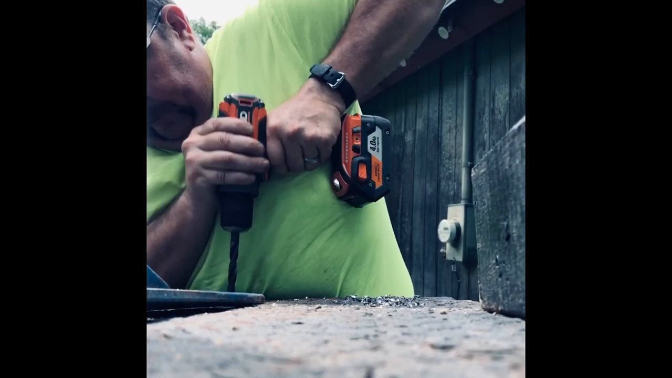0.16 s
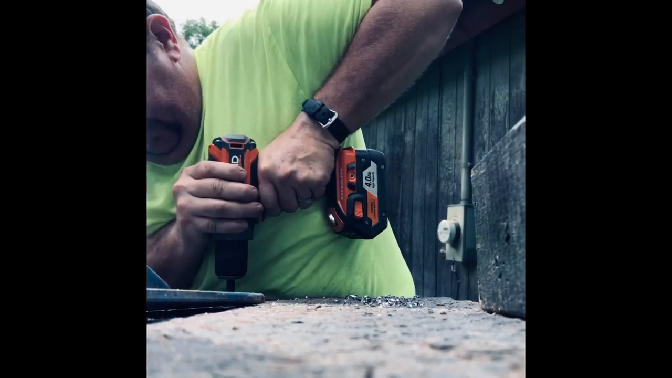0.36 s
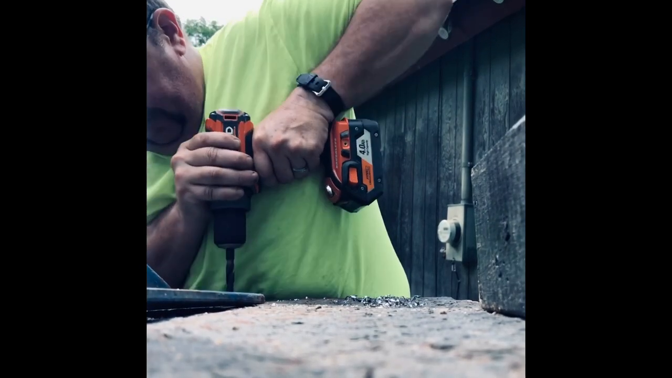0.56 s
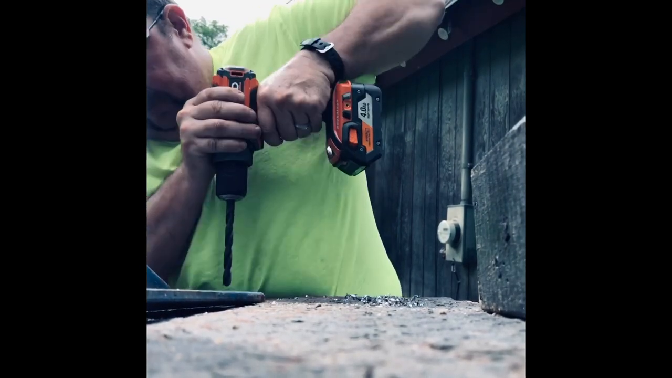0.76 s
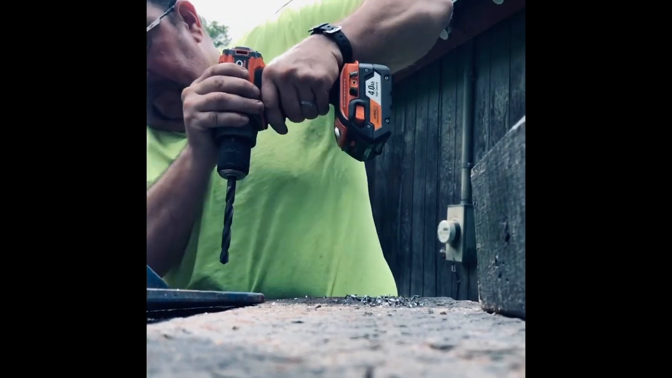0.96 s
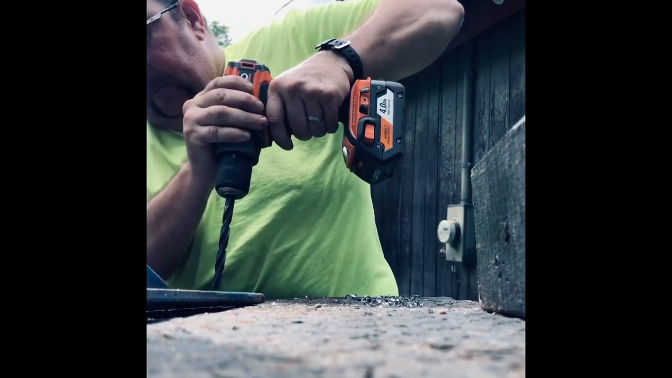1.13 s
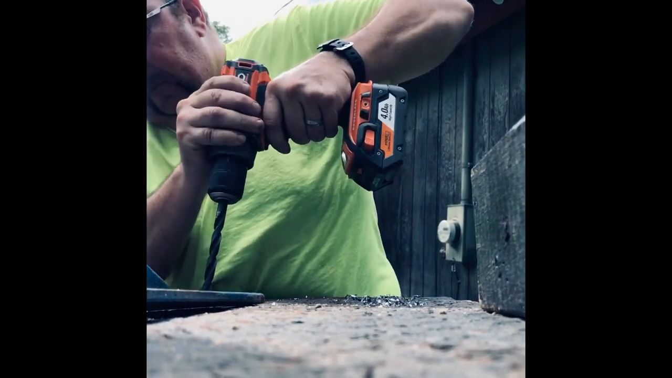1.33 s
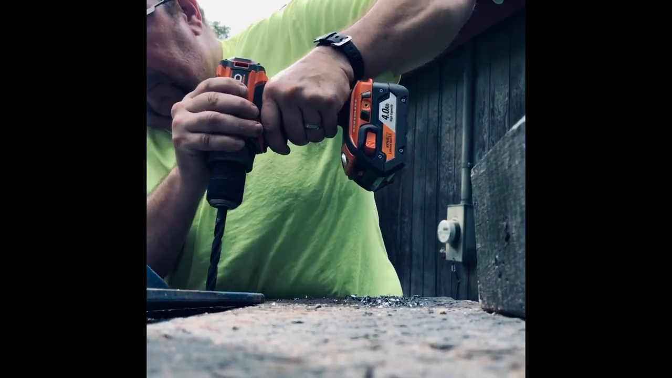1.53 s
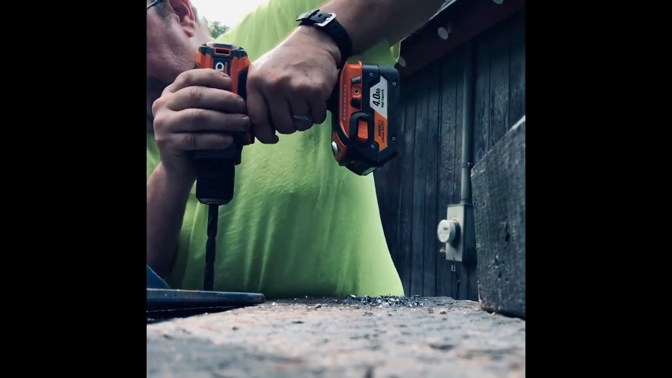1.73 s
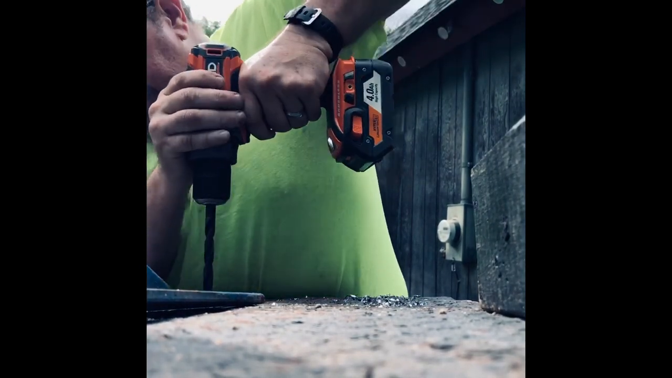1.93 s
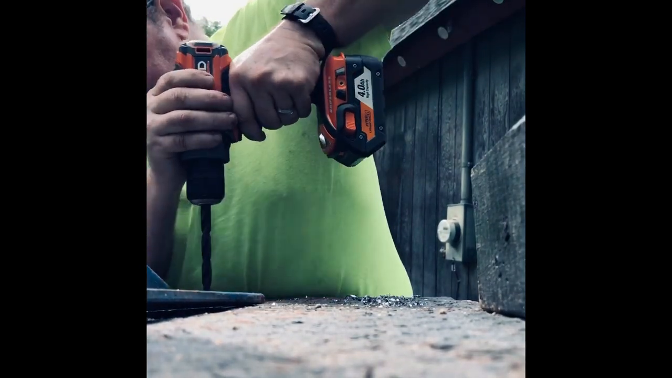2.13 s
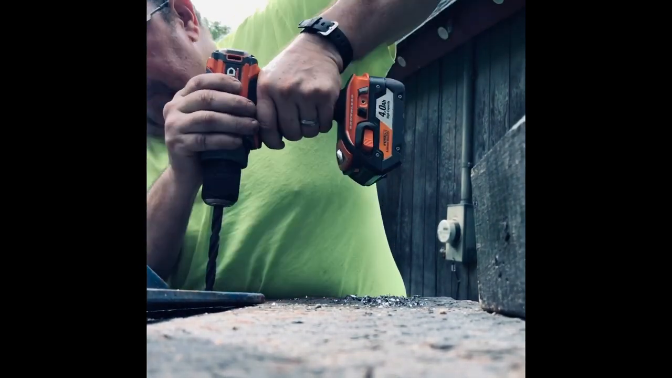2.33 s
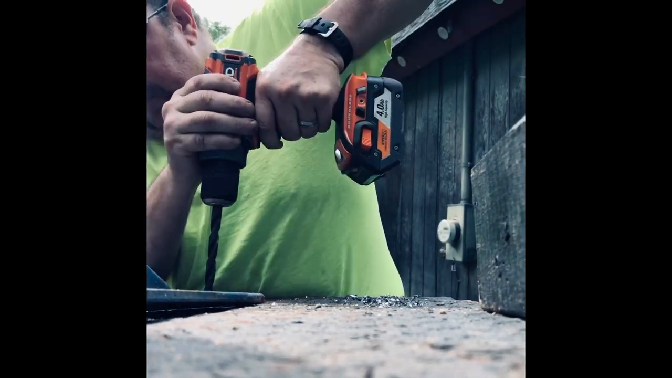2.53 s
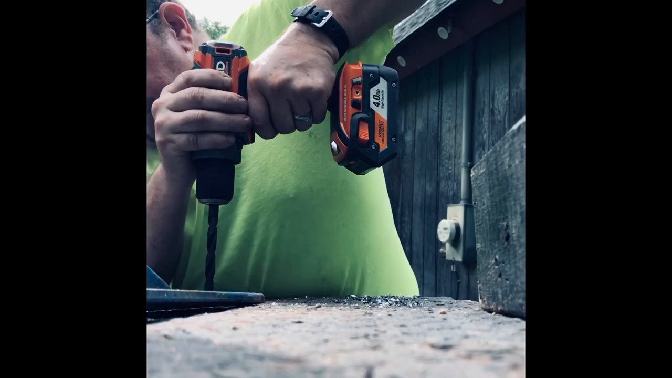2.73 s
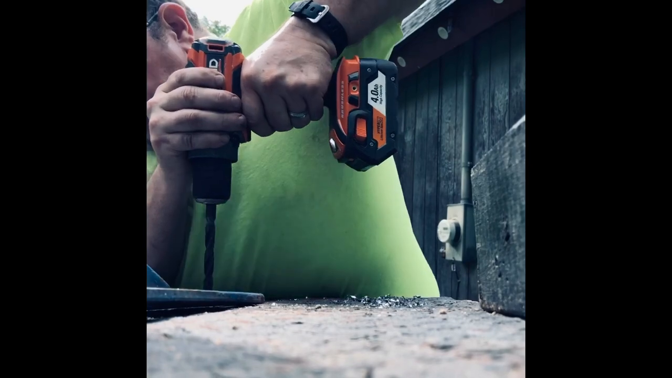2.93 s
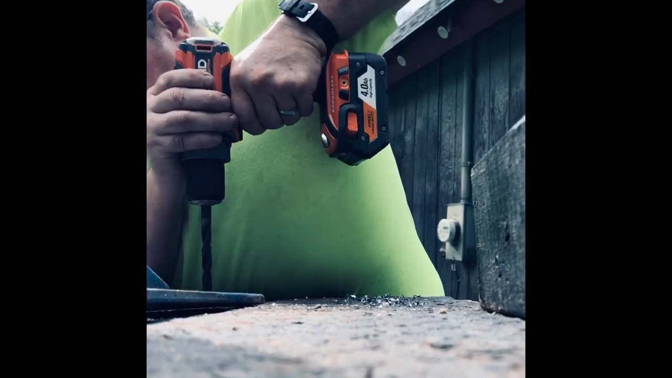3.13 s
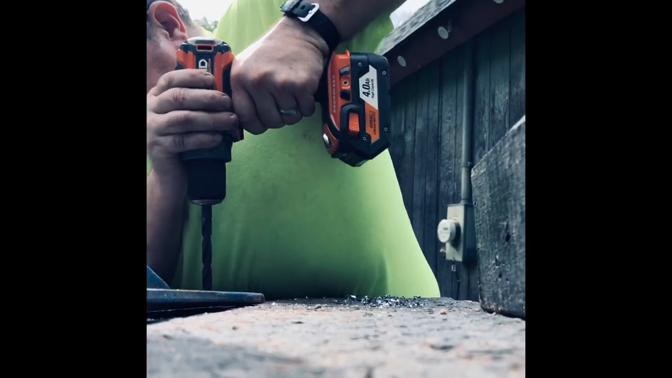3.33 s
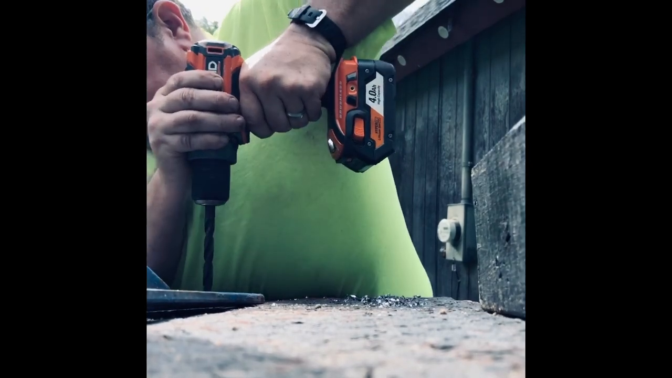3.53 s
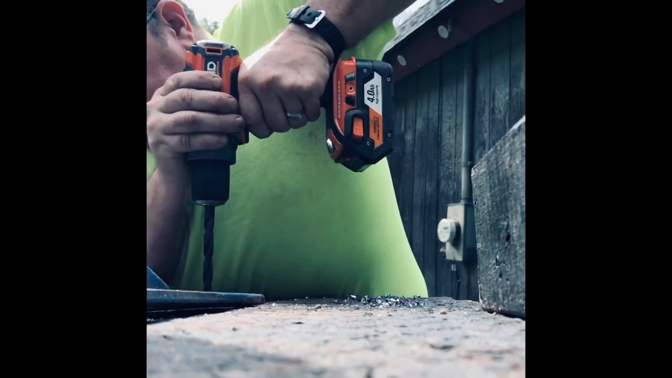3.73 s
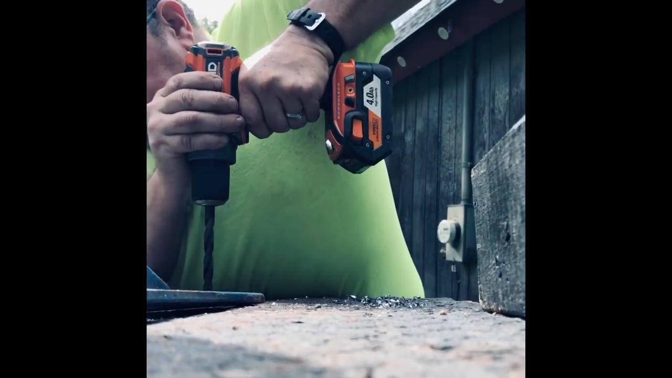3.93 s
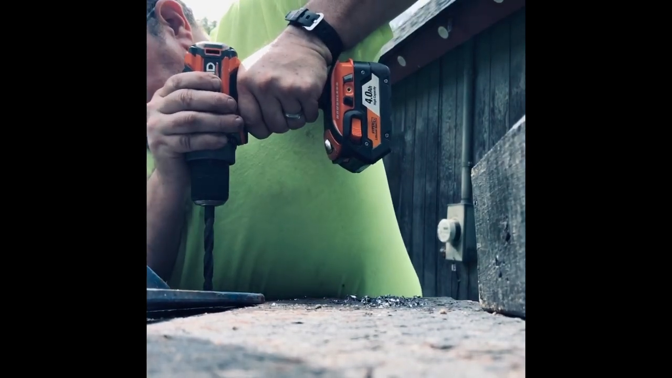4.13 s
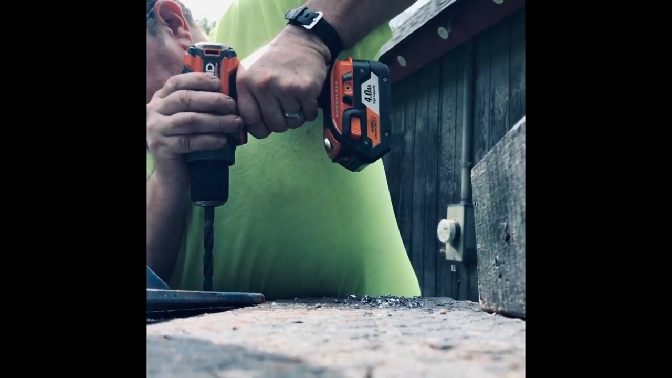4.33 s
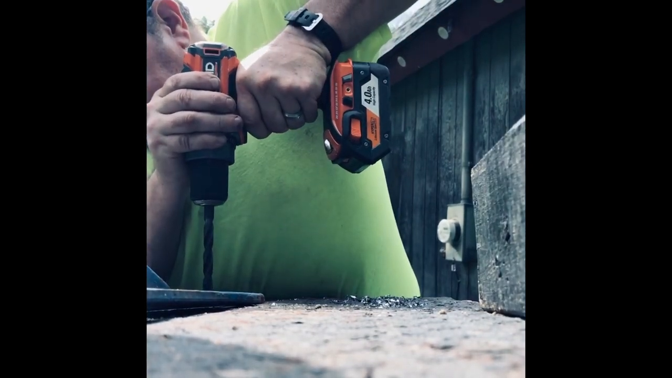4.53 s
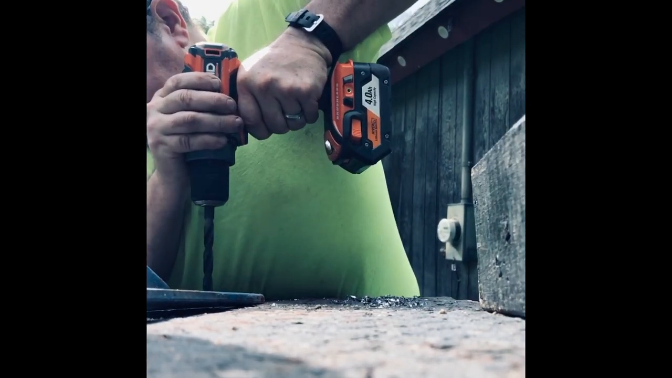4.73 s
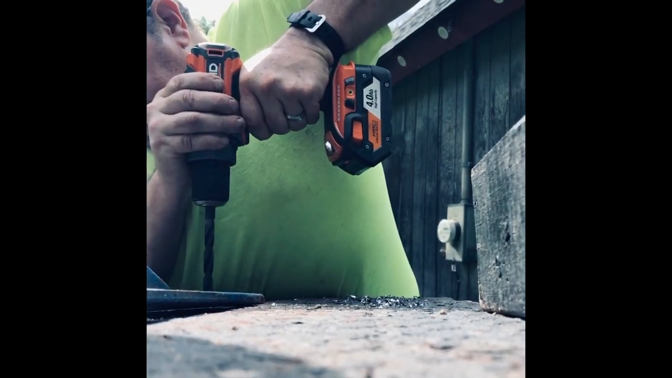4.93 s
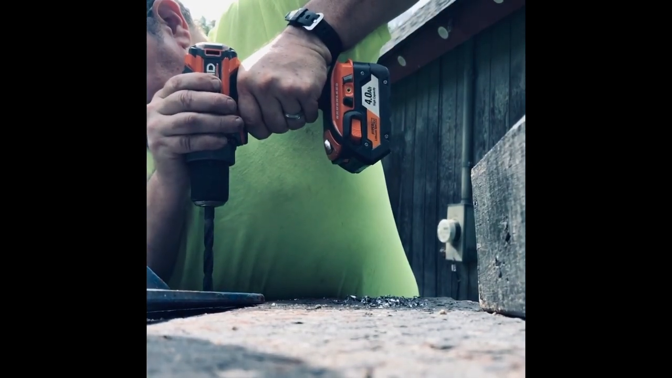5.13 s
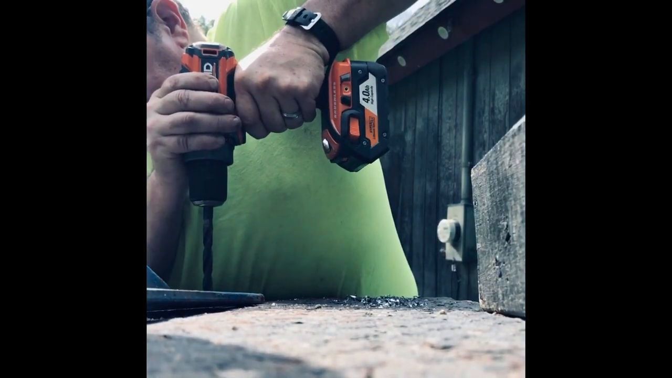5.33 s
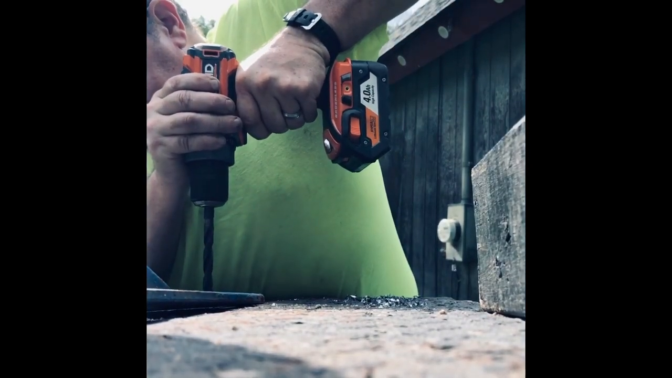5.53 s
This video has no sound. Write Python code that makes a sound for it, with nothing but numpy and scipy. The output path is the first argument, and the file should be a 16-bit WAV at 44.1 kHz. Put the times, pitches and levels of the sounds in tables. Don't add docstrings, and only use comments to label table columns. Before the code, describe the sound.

Outdoors and close up, a cordless drill bores ringing sheet metal in two bursts, with hard knocks and a quiet pause between them.

```python
import sys
import numpy as np
from scipy import signal
from scipy.fft import rfft, irfft, next_fast_len
from scipy.io import wavfile
from scipy.ndimage import map_coordinates

SR = 44100
rng = np.random.default_rng(int(sys.argv[2]) if len(sys.argv) > 2 else 0)


def field_ratio(decibels):
    return 10 ** (np.asarray(decibels, dtype=float) / 20)


def transcribe(signal):
    frames = np.atleast_2d(signal).T
    limited = np.clip(frames, -1, 1)
    pcm = np.round(limited * 32767).astype(np.int16)
    wavfile.write(sys.argv[1], SR, pcm)


N = 245195
TIME = np.arange(N) / SR

RELEASE_S, BRAKE_S, STOP_S = .735, .826, 0.911
START_S, BITE_IN_S, DEEP_S = 2.72, 2.75, 3.055
COAST_HZ, COAST_DB, SPIN_UP_S, SPIN_GAP_HZ, SPIN_LOSS_DB = 310, 7, .043, 1250, 30
STOP_DB_PER_S, RISE_DB_PER_S = 902, 415
WHINE_ORDER, TEETH_PER_TURN, SNAG_AT_S = 2.37, 198, 4.508

# frequency in Hz, level in dB per Hz.
YARD_AIR = [(15, -60), (35, -34), (60, -19.5), (150, -14.5), (317, -15), (450, -18.5), (1190, -23.5),
            (1500, -30.5), (3500, -32), (6000, -38.5), (10000, -49.5), (16000, -74)]
# centre in seconds, level in dB, width in seconds.
RUMBLES = [(.1, -34.5, 0.32), (.75, -34, 0.18), (1.15, -57, 0.12), (1.5, -42.5, 0.16), (3.2, -29.5, 0.34),
           (3.7, -38, 0.33)]

# start in seconds, length in seconds, last switching tone in Hz,
# last buzz in dB, last grind in dB.
FEATHER = [
    (1.905, 0.1405, 9880, -41, -31),
    (2.667, 0.057, 9540, -17.5, -22),
]
# centre in seconds, level in dB, width in seconds.
BRAKE_BUZZ = [
    (.912, -28, 0.0086),
]
# frequency in Hz, level in dB per Hz.
GRIND = [(88, -26.5), (150, -3), (297, -1.5), (448, -2.5), (905, -4.5), (2980, -2), (6020, -14.5),
         (10200, -17), (16000, -44.5)]

# start in seconds, level in dB, 60 dB decay in seconds.
THUDS = [(.285, -18.5, 0.18), (.468, -19, 0.076), (1.429, -29, 0.33), (1.48, -27.5, 0.22),
         (1.52, -35, 0.33), (1.605, -27, 0.085), (1.97, -46, 0.088)]
# start in seconds, peak in dB, pitch in Hz, 60 dB decay in seconds.
CLANKS = [(.012, -7.5, 3610, 0.072), (.022, -3.5, 4270, 0.052), (0.063, -12, 1494, .09),
          (.497, -5.5, 4110, 0.05), (.827, -14, 2840, .034), (2.809, -4, 4504, 0.025),
          (2.808, -9, 2280, 0.057)]
BONKS = [(.466, -12, 406, 0.099), (.509, -9, 520, 0.15), (0.529, -11, 516, 0.16), (.552, -2.5, 980, 0.015),
         (0.694, -12.5, 367, 0.087), (1.432, -19.5, 480, 0.2), (1.484, -25, 529, 0.19),
         (1.982, -28, 230, 0.13)]
SNAPS = [
    (.605, -11.5, 3950, .04),
    (0.638, -8, 3630, 0.055),
    (0.674, -13, 3330, 0.044),
]
TICKS = [(1.425, -38, 2490, .1), (1.485, -45, 2500, .1), (1.908, -38, 6000, .03), (2.424, -29, 3740, 0.058),
         (2.489, -28.5, 4880, 0.041), (2.497, -38, 7500, .034), (2.668, -31, 7000, 0.032)]
AFTER_RING = [
    (0.93, -40, 320, 1.7),
]
FLICK = [
    (2.728, 0.77, 2830, 0.041),
]
STREAK = [
    (.058, -21, 3770, .15),
]
# smear as a share of pitch, crack from 0 to 1, glide in Hz per second.
KNOCK_KINDS = [
    (0.043, 0.48, 0),
    (.06, 0.06, 0),
    (0.052, 1, 0),
    (.25, .2, 0),
    (.02, 0, -2),
    (.02, 0.1, 50000),
    (.01, .05, -24000),
]

# frequency in Hz, width in Hz, level in dB.
PANEL = [(100, 26, -16.5), (144, 28, -10), (231.3, 44.5, -2.5), (289.5, 45.4, -3), (365.4, 37, -0.5),
         (480, 77, -1.5), (515.6, 25, 3.5), (588, 75, -4), (726, 280, -8)]
# frequency in Hz, width in Hz, level in dB.
SHANK = [(989, 114, 3), (1622, 510, 1)]
# frequency in Hz, width in Hz, level in dB.
SHEET = [(2320, 43, -0.5), (2626, 60, -2.5), (2763, 115, -5.5), (3015, 102, -3), (3320, 43, -3.5),
         (3480, 29, -8.5), (3562, 39, 0), (3765, 66, -1), (4110, 54, -2.5), (4390, 93, -5.5),
         (4826, 150, -11.5), (5420, 140, -16)]
# frequency in Hz, level in dB per Hz.
HISS = [(2940, -30), (5000, 0.5), (5250, -1.5), (6100, 1), (6380, -2), (8330, 2), (11300, -12.5),
        (15100, -11.5), (16000, -26)]
# centre in seconds, level in dB, width in seconds.
SPRAYS = [
    (.08, -33, 0.049),
    (.36, -35.5, 0.08),
    (2.78, -35.5, 0.014),
]
# time in seconds, feed in dB, edge chatter in dB.
FEED_REAMING = [(0, -20, -14.5), (.08, -22, -16.5), (.18, -24.5, -31), (.276, -24, -33), (.29, -23, -31),
                (.46, -24.5, -26), (.47, -16.5, -24), (.68, -17, -28.5), (.82, -37, -30.5)]
# time in seconds, feed in dB, edge chatter in dB.
FEED_BORING = [(2.75, -16, -16), (2.79, -17.5, -23), (2.86, -16.5, -23.5), (3.3, -13, -20),
               (3.8, -18, -20.5), (4.2, -15, -17), (4.4, -19, -16.5), (5.05, -17, -18),
               (5.56, -20.5, -18.5)]
# time in seconds, share from 0 to 1.
SNAG = [(2.8, 0), (2.87, .25), (3.8, .15), (4.1, .33), (4.35, .45), (4.45, .7), (5.1, .75), (5.45, .7),
        (5.52, .2)]

# time in seconds, gear mesh in Hz, mesh level in dB.
REAMING = [(0, 3490, -20), (.045, 3400, -26), (.098, 2300, -15), (.125, 2280, -14.5), (.2, 3130, -16.5),
           (0.259, 3290, -19.5), (.385, 3080, -18.5), (0.501, 3310, -25), (.735, 3320, -19)]
# time in seconds, gear mesh in Hz, mesh level in dB.
BORING = [(2.95, 3165, -12), (3.035, 3165, -12), (3.11, 3060, -12.5), (3.65, 3040, -10), (3.9, 2970, -13.5),
          (4.3, 2950, -15), (4.9, 2903, -17), (5.45, 2922, -17), (5.56, 3060, -11)]
# frequency in Hz, level in dB.
HOUSING = [(5400, -28), (6000, -17), (6550, -28), (6870, -28.5), (7300, -26), (7500, -21.5), (7800, -25),
           (8200, -54)]
# centre in seconds, level in dB, width in seconds.
BRAKE_STRAIN = [
    (.845, -19, .02),
    (.895, -21.5, 0.016),
]
# centre in seconds, loss in dB, width in seconds.
SLIPS = [(.112, 16, .014), (.05, 10, 0.027), (.168, 18, 0.01), (.265, 9.5, 0.039), (.865, 8, 0.0067),
         (3.3, 3.5, 0.17), (4.8, 8, 0.089), (5.08, 5, 0.041)]
# centre in seconds, loss in dB, width in seconds.
WHINE_GAPS = [(.03, 30, .035), (.103, 16, 0.0052), (.155, 22, 0.035), (.75, 10, 0.044), (2.78, 12, 0.035)]


def unit(x):
    return x / np.sqrt(np.mean(x ** 2) + 1e-20)


def curves(rows):
    s, *cols = np.transpose(rows)
    return np.array([np.interp(TIME, s, c) for c in cols])


def wobble(rate):
    knots = rng.standard_normal(int(N * rate / SR) + 4)
    return map_coordinates(knots, [np.arange(N) * rate / SR])


def swells(rows):
    bells = sum(field_ratio(db) * np.exp(-((TIME - s) / width) ** 2) for s, db, width in rows)
    return 20 * np.log10(bells + 1e-5)


def dips(rows):
    return sum(db * np.exp(-((TIME - s) / width) ** 2) for s, db, width in rows)


def filtered(x, response):
    m = next_fast_len(N + SR // 4)
    return irfft(rfft(x, m) * response(np.fft.rfftfreq(m, 1 / SR)), m)[:N]


def modes(table):
    return lambda f: sum((-1) ** k * field_ratio(db) * 1j * f * w / (c * c - f * f + 1j * f * w)
                         for k, (c, w, db) in enumerate(table))


def colour(points):
    hz, db = np.transpose(points)
    return lambda f: field_ratio(np.interp(np.log(f + 1), np.log(hz), db))


def chips(rate, depth_db):
    return field_ratio(depth_db * wobble(rate)) * rng.standard_normal(N)


def coasting():
    return np.clip((TIME - RELEASE_S) / (BRAKE_S - RELEASE_S), 0, 1)


def yard():
    recovered = 1 - np.exp(-np.clip(TIME - STOP_S, 0, 9) / 0.35)
    air_db = -47 + 5.5 * recovered + 0.94 * wobble(5.93)
    air = field_ratio(air_db) * unit(filtered(rng.standard_normal(N), colour(YARD_AIR)))
    hum = field_ratio(-39.5 + 1.5 * wobble(15)) * np.sin(2 * np.pi * 120.7 * TIME + .4 * wobble(15))
    rumble = unit(filtered(rng.standard_normal(N), modes([(59.3, 32, 1.2), (107, 94, 2.7)])))
    rumble_db = swells(RUMBLES + [(3, -56, 9)])
    return air + hum + field_ratio(rumble_db) * rumble


def feather():
    first_hz, held_hz, settle_s = 10050, 9900, .025
    first_buzz_db, first_grind_db = -34.5, -46.5
    hz, gate, buzz_db, grind_db = np.zeros((4, N))
    for s, length, last_hz, last_buzz_db, last_grind_db in FEATHER:
        since = TIME - s
        u = since / length
        on = (u > 0) & (u < 1.2)
        settling = (first_hz - held_hz) * np.exp(-np.abs(since) / settle_s)
        hz[on] = (held_hz + settling + (last_hz - held_hz) * u ** 2)[on]
        gate[on] = np.clip(np.minimum(since / 0.0062, (length - since) / 0.026 + 1), 0, 1)[on]
        buzz_db[on] = (first_buzz_db + (last_buzz_db - first_buzz_db) * u)[on]
        grind_db[on] = (first_grind_db + (last_grind_db - first_grind_db) * np.clip(1.47 * u, 0, 1))[on]
    turn = 2 * np.pi * np.cumsum(hz) / SR
    mirror = sum(np.sin(2 * np.pi * fold_hz * TIME - turn) for fold_hz in (20230, 20330))
    tone = field_ratio(-41 + 1.6 * wobble(54)) * (np.sin(turn + .5 * wobble(150)) + field_ratio(-11) * mirror)
    buzz = unit(filtered(chips(250, 2.8), modes([(3130, 180, 6.0), (9300, 920, -32.0)])))
    grind = unit(filtered(chips(150, 0.89), colour(GRIND)))
    buzz_gain = gate * field_ratio(buzz_db) + field_ratio(swells(BRAKE_BUZZ))
    return gate * (tone + field_ratio(grind_db) * grind) + buzz_gain * buzz


def thuds():
    blows, t = np.zeros(N + SR), np.arange(SR // 2) / SR
    for s, db, t60 in THUDS:
        fade = field_ratio(db + 21.5 - 60 * t / t60) * (1 - np.exp(-t / 0.0039))
        blows[round(s * SR):][:len(t)] += fade * rng.standard_normal(len(t))
    return filtered(blows[:N], lambda f: modes(PANEL)(f) / (1 + 1j * f / 900) ** 2)


def knocks():
    out, t = np.zeros(N + SR), np.arange(SR // 2) / SR
    groups = (CLANKS, BONKS, SNAPS, TICKS, AFTER_RING, FLICK, STREAK)
    for group, (smear, crack, glide) in zip(groups, KNOCK_KINDS):
        for s, db, hz, t60 in group:
            fade = field_ratio(db - 60 * t / t60) * (1 - np.exp(-t / 0.00027))
            noise = rng.standard_normal((2, len(t)))
            drift = np.cumsum(noise[0]) * np.sqrt(2 * np.pi * abs(smear) * hz / SR)
            ring = np.sin(2 * np.pi * (hz + glide * t / 2) * t + drift)
            out[round(s * SR):][:len(t)] += fade * (ring + crack * noise[1])
    return filtered(out[:N], lambda f: 1 / (1 + 1j * f / 9000) ** 2)


def effort():
    lifted = [(STOP_S, *FEED_REAMING[-1][1:])]
    feed_db, chatter_db = curves(FEED_REAMING + lifted + FEED_BORING)
    fall_db = STOP_DB_PER_S * np.clip(TIME - STOP_S, 0, 1)
    rise_db = RISE_DB_PER_S * np.clip(BITE_IN_S - TIME, 0, 1)
    idle_db = np.minimum(fall_db, rise_db)
    scrape_db = -10 + 0.33 * feed_db + 0.29 * chatter_db
    steady_hiss_db = -23 + 0.34 * feed_db + 0.058 * chatter_db - 4.5 * coasting() * (TIME < 1)
    hiss_db = 20 * np.log10(field_ratio(steady_hiss_db) + field_ratio(swells(SPRAYS)))
    return np.array([feed_db, scrape_db, chatter_db, hiss_db]) - idle_db


def bites(chuck):
    push = np.zeros(N)
    at = np.flatnonzero((np.diff(np.floor(chuck)) > 0) & (TIME[1:] > BITE_IN_S))
    for i, share, chance in zip(at, curves(SNAG)[0][at], rng.standard_normal(len(at))):
        u = np.clip((TIME - TIME[i] + 0.0096) / 0.053, 0, 9)
        bite_db = -23.5 + 8.5 * share + 0.5 * (1 - share) * chance
        push += field_ratio(bite_db) * (1 - np.exp(-u * 9)) * np.exp(-u ** 3)
    return push


def sheet_ring(ring_db, push, load):
    grit = chips(160, 2.0)
    scale = np.sqrt(np.mean(filtered(grit, modes(SHEET)) ** 2))
    swing_db = 14 * np.roll(load, 850)
    drive = field_ratio(ring_db - 2 + swing_db) + field_ratio(-5) * push
    return filtered(drive * grit, modes(SHEET)) / scale


def cut(push, load):
    boom_db, scrape_db, ring_db, hiss_db = effort()
    hand = wobble(28)
    boom = field_ratio(boom_db - 2.3 + 0.53 * hand) * unit(filtered(chips(80, 2.3), modes(PANEL)))
    scrape = field_ratio(scrape_db - 0.37 + 0.92 * hand) * unit(filtered(chips(90, 1.63), modes(SHANK)))
    ring = sheet_ring(ring_db + .6 * hand, push, load)
    hiss_db = hiss_db + 6.5 + 6.2 * np.roll(load, -600) + 0.84 * hand
    hiss_colour = colour([(1500, -27), (3500, 8)] + HISS[1:])
    hiss = field_ratio(hiss_db) * unit(filtered(chips(200, 1.6), hiss_colour))
    return boom + scrape + ring + hiss


def shaft():
    rest = [(1.5, *REAMING[-1][1:]), (1.6, *BORING[0][1:])]
    hz, mesh_db = curves(REAMING + rest + BORING)
    late = TIME > START_S
    braking = (TIME > BRAKE_S) & (TIME < START_S)
    coast = coasting() * ~late
    lag = np.exp(-np.abs(TIME - START_S) / SPIN_UP_S) * late
    hz += -COAST_HZ * coast - SPIN_GAP_HZ * lag
    mesh_db += -COAST_DB * coast - SPIN_LOSS_DB * lag ** 2
    half_db = mesh_db - 21 + 17 * coast ** 0.25

    since = (TIME - BRAKE_S)[braking]
    slowed = np.clip(since / .094, 0, 1) ** 1.3
    hz[braking] = 1030 + (2950 - 1030) * (1 - slowed)
    stopped_db = STOP_DB_PER_S * np.clip(since + BRAKE_S - STOP_S, 0, 1)
    mesh_db[braking] = -14 - 230 * since - stopped_db
    half_db[braking] = -18 - 130 * since - stopped_db

    whine_db = np.interp(WHINE_ORDER * hz, *np.transpose(HOUSING)) - SPIN_LOSS_DB * lag
    whine_db -= dips(WHINE_GAPS) + 8 * np.clip((TIME - DEEP_S) * 50, 0, 1)
    whine_db[braking] -= 700 * since
    chuck = np.cumsum(hz) / SR / TEETH_PER_TURN
    return hz, mesh_db - dips(SLIPS), whine_db, half_db, chuck - chuck[round(SNAG_AT_S * SR)]


def motor(hz, mesh_db, whine_db, half_db, load):
    turn = 2 * np.pi * np.cumsum(hz * (1 - .05 * load + .002 * wobble(60))) / SR
    drag = np.clip(load, 0, 1)
    contact_db = -6 * load - 65 * drag ** 2 + 5.5 * curves(SNAG)[0] ** 2 * wobble(55)
    mesh_gain = field_ratio(mesh_db + contact_db + (1.8 + 4 * drag) * wobble(70))
    mesh = mesh_gain * np.sin(turn + (.3 + 1.2 * drag) * wobble(110))
    mesh += field_ratio(mesh_db - 38 + 3 * wobble(30)) * np.sin(4 * turn)
    winding = np.sin(WHINE_ORDER * turn) + field_ratio(-23) * np.sin(2 * WHINE_ORDER * turn)
    whine = field_ratio(whine_db + 2 * wobble(45)) * winding
    half = field_ratio(half_db + 2.7 * wobble(60)) * np.sin(turn / 2 + 1.0 * wobble(90))
    quarter_db = np.minimum(half_db - 5, -36) + 3.5 * wobble(40)
    half += field_ratio(quarter_db) * np.sin(turn / 4 + 0.28 * wobble(60))
    orders = sum(field_ratio(3 * wobble(70)) * np.sin(k * turn + .3 * wobble(200)) for k in (1.5, 2, 2.5, 3, 3.5, 4))
    strain = filtered(field_ratio(swells(BRAKE_STRAIN)) * orders, modes([(2880, 280, 7.5), (6040, 3100, -38)]))
    return np.sqrt(2) * (mesh + whine + half) + strain


def scene():
    *tones, chuck = shaft()
    snag_shape = np.cos(2 * np.pi * chuck) + np.cos(4 * np.pi * chuck) / 5
    load = curves(SNAG)[0] * snag_shape / 2
    drill = cut(bites(chuck), load) + motor(*tones, load)
    return (yard() + feather() + thuds() + knocks() + drill)[None]


def top_cut(x):
    return signal.sosfilt(signal.butter(12, 17020, fs=SR, output="sos"), x)


def record(dry):
    x = filtered(dry[0], lambda hz: (1j * hz / (1j * hz + 45)) ** 2)
    x = x / (1 + np.abs(x / .99) ** 6) ** (1 / 6)
    mix = filtered(x, lambda hz: hz < 15830)[None]
    return top_cut(mix)


dry = scene()
out = record(dry)
transcribe(out)
```